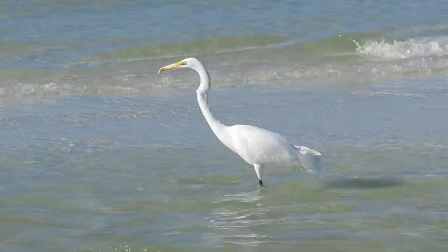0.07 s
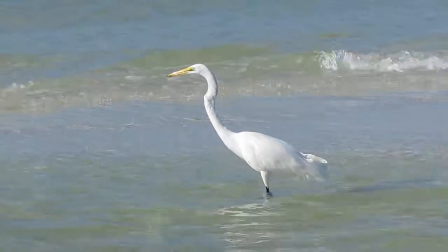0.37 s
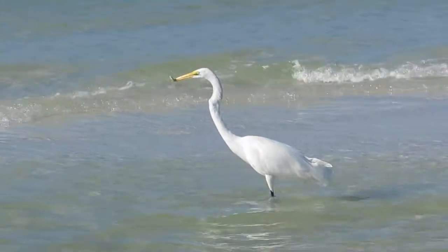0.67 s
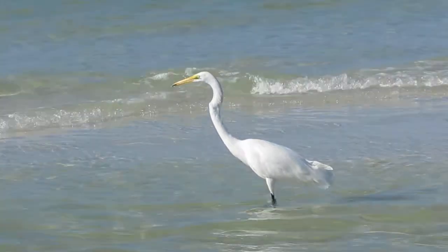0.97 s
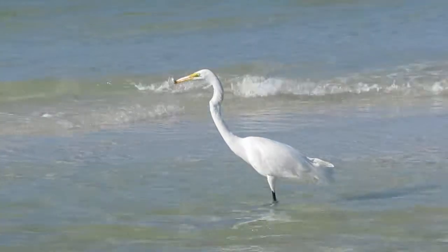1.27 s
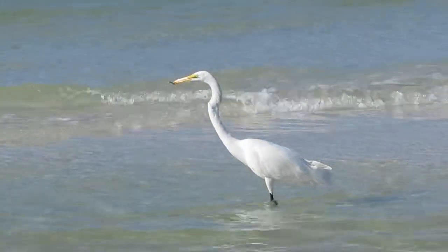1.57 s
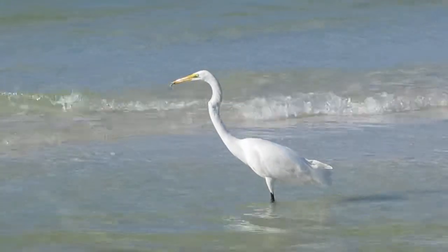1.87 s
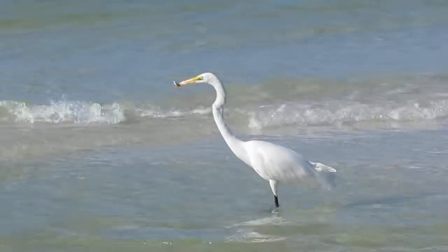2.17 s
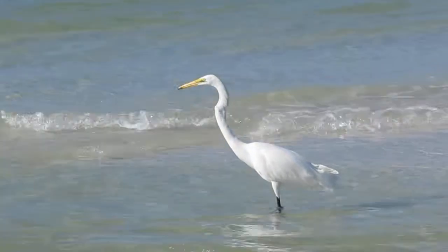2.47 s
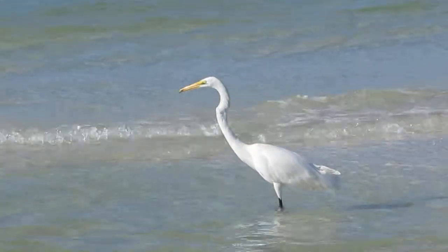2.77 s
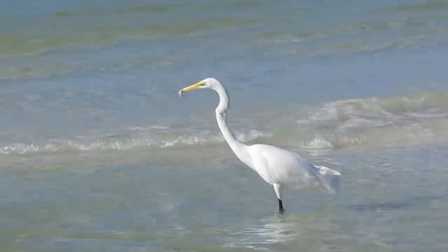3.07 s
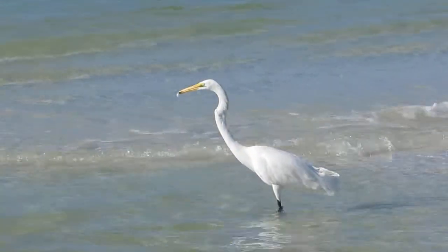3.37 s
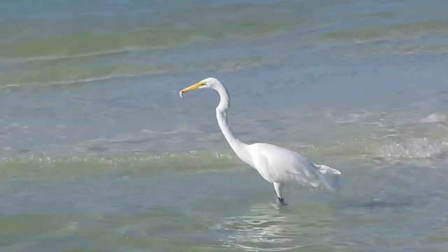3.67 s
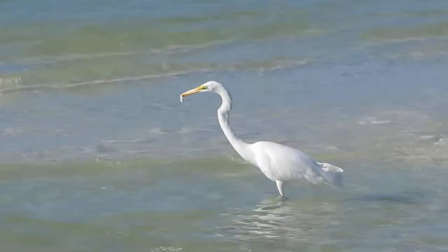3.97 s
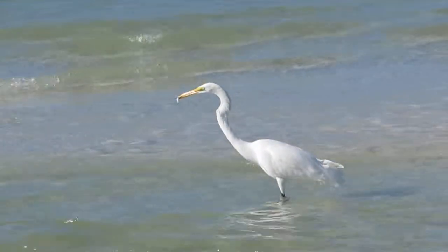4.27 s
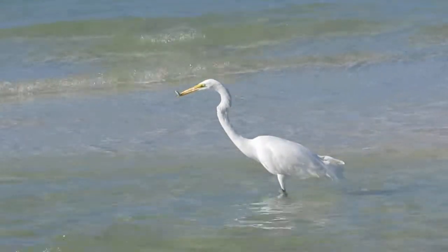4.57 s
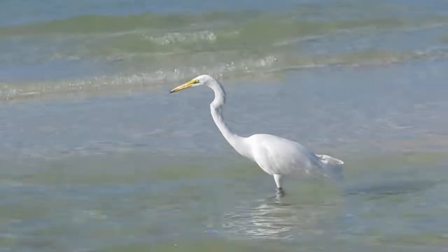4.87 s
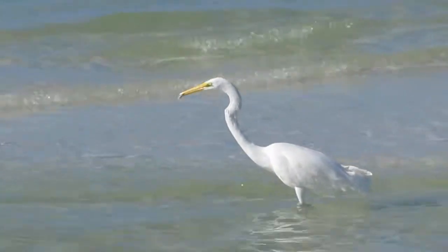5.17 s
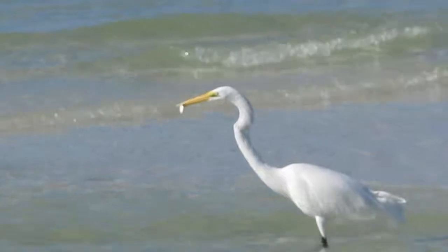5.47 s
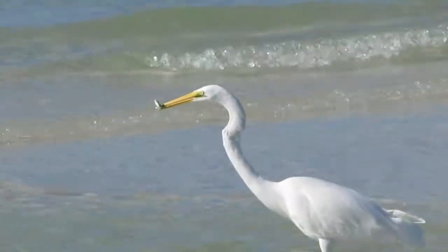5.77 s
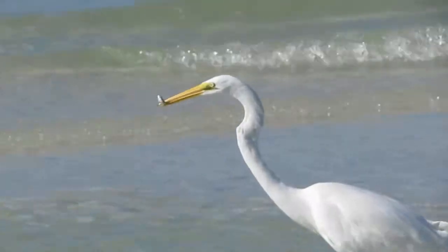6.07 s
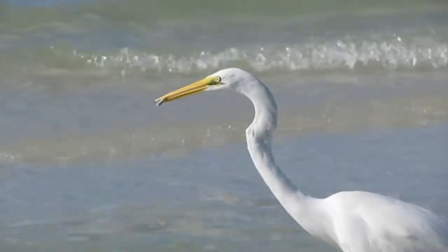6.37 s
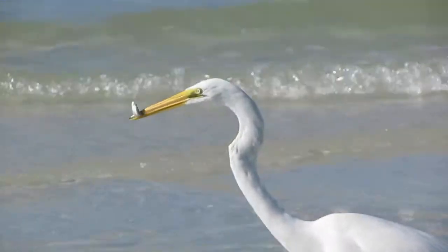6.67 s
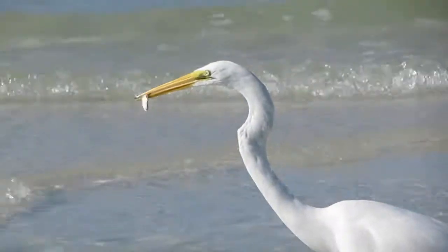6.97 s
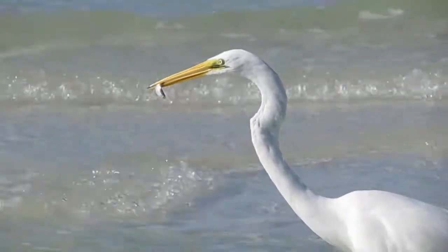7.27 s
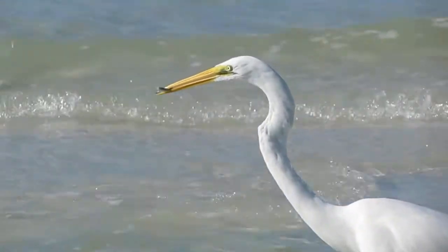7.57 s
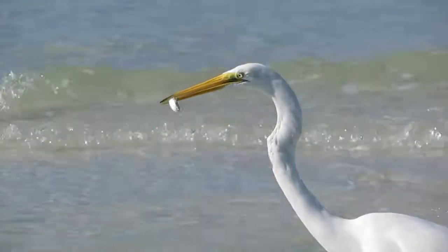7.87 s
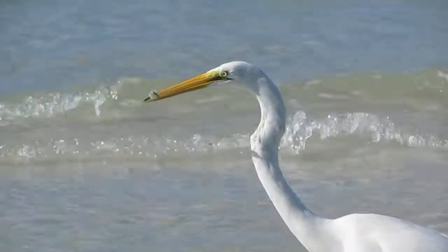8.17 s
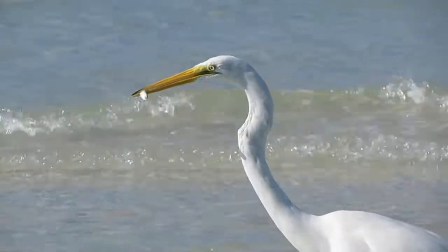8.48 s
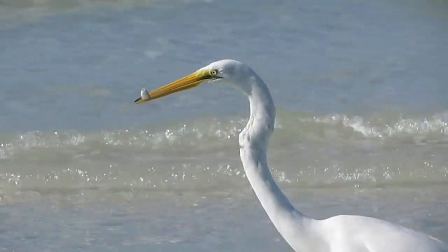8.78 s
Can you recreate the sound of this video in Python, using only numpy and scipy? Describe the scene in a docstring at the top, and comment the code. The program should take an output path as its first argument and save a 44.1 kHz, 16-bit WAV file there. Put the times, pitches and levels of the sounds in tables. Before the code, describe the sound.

Wind rumbles and thumps on the microphone at a beach, with small waves washing faintly behind it.

```python
"""A breeze buffets a stereo microphone on a beach, opening on a click and rumbling throughout.
Eddies flutter and thump on the windward port and a few crack off its rim; the sheltered port only rumbles.
A stereo widener feeds each port to the other side upside down. Behind the wind, small waves break
in the shallows: countless bubbles make the wash and the fizz of foam, and a few drops splash."""
import sys
import numpy as np
from scipy import signal
from scipy.fft import rfft, irfft, next_fast_len
from scipy.io import wavfile
from scipy.ndimage import uniform_filter1d, minimum_filter1d

SR = 44100
rng = np.random.default_rng(int(sys.argv[2]) if len(sys.argv) > 2 else 0)


def digitize_waveform(pressure):
    """Quantize a signal to 16-bit integers and store it at the path in sys.argv[1].

    Rows of a 2-D input are taken as channels; values are limited to [-1, 1].
    """
    field = np.atleast_2d(pressure).T
    bounded = np.clip(field, -1, 1)
    quanta = np.round(bounded * 32767).astype(np.int16)
    wavfile.write(sys.argv[1], SR, quanta)


N = 394254
TIME = np.arange(N) / SR
START_S = 0.0724   # silence until here

# Levels in the tables are relative: each layer gets its final trim in the functions.
# strength of the breeze, as rumble on the ports: time_s, level_db
BREEZE = [(0.13, -12.5), (0.38, -16), (0.52, -16), (0.68, -15.5), (0.92, -14), (1.1, -14.5), (1.22, -15.5),
          (1.33, -15.5), (1.58, -15), (1.87, -15), (2.15, -16.5), (2.27, -17), (2.37, -16.5), (2.47, -12.5),
          (2.61, -20.5), (2.8, -13.5), (3.0, -15.5), (3.13, -14.5), (3.27, -18.5), (3.38, -15), (3.6, -16),
          (3.78, -15), (4.17, -18.5), (4.33, -15), (4.62, -14.5), (4.77, -17), (4.84, -21.5), (4.91, -14),
          (4.99, -20), (5.07, -14.3), (5.24, -18.5), (5.45, -16), (5.62, -15.5), (5.85, -19), (5.99, -15.5),
          (6.25, -18), (6.48, -16), (6.58, -17), (6.68, -15.5), (6.82, -17.5), (7.05, -16.5), (7.19, -14.5),
          (7.37, -16.5), (7.49, -17), (7.72, -18), (7.98, -17.5), (8.1, -15), (8.2, -19), (8.37, -14),
          (8.5, -17.5), (8.71, -15.5), (8.82, -18), (8.94, -15.3)]
# pressure spectrum of the turbulence: frequency_hz, level_db
TURBULENCE_EQ = [(15, -35), (25, -22), (50, -2.5), (100, 0.6), (160, -0.2), (235, -2.5), (350, -6.5),
                 (420, -8), (600, -15.5), (850, -26.5), (1200, -37), (1700, -45), (3000, -76)]
# fader for the deepest rumble: time_s, level_db
DEEP_RUMBLE = [(0.1, -6), (1.4, 2.5), (3.5, 1), (4.7, 3), (5.7, 5), (6.5, 1), (7.9, -1), (8.94, -5)]
# fader for the flutter of small eddies: time_s, level_db
FLUTTER_RIDE = [(0.12, -9), (0.32, -14.5), (0.6, -9.5), (0.95, -11), (1.6, -13.5), (1.8, -11.5), (2.3, -11),
                (2.8, -11.5), (3.2, -12), (3.56, -11.5), (3.78, -14), (4.2, -15), (4.42, -16), (4.8, -16.5),
                (5.05, -13.5), (5.65, -16), (6.05, -12), (6.55, -13), (6.87, -10), (7.2, -14), (7.44, -9),
                (7.75, -14), (8.4, -14), (8.7, -15), (8.94, -14)]
# thumps of the strongest single vortices: centre_s, level_db, pitch_hz
THUMPS = [(0.074, -2, 198), (0.079, 1, 135), (0.085, -6, 125), (0.111, -4, 190), (0.159, -2, 200),
          (0.168, 4, 155), (0.182, -0.5, 200), (0.218, -6, 320), (0.256, 0, 125), (0.296, -0.5, 120),
          (0.486, 1.5, 160), (0.569, -1, 344), (0.598, -4, 200), (0.655, 3, 129), (0.699, -2.5, 230),
          (0.936, 3, 145), (0.992, 2, 190), (1.067, -9, 220), (1.108, -4, 220), (1.341, 3.5, 155),
          (1.367, -4, 237), (1.42, -1, 190), (1.54, 4, 150), (1.764, 0, 185), (1.802, 0.5, 170),
          (1.821, 2, 205), (1.838, 0.5, 105), (1.856, -3, 190), (1.873, 1, 155), (1.976, 0, 191),
          (2.045, 4, 132), (2.248, 1.5, 155), (2.271, 2, 115), (2.299, 1, 133), (2.307, -1, 222),
          (2.471, 2, 175), (2.5, 2, 180), (2.609, -1, 147), (2.823, -14, 280), (2.858, -0.5, 250),
          (2.884, 1.5, 290), (2.888, -1.5, 310), (3.016, -1, 210), (3.053, -8, 330), (3.098, -1, 230),
          (3.122, 0.5, 95), (3.223, 1.5, 110), (3.236, 0, 225), (3.647, -5.5, 230), (3.756, 0, 221),
          (3.926, -7, 340), (3.962, -1, 205), (4.098, -4, 246), (4.412, 0.5, 153), (4.67, 0.5, 141),
          (4.766, -1.5, 130), (4.873, 0.5, 110), (5.061, 1, 146), (5.082, 2, 120), (5.125, 0, 145),
          (5.773, 0.5, 200), (5.891, -1, 114), (5.963, -4.5, 300), (6.027, -7, 220), (6.066, -2.5, 160),
          (6.1, 0, 126), (6.208, 0, 138), (6.405, -6, 230), (6.475, 1, 149), (6.693, -0.5, 141),
          (6.763, -0.5, 131), (6.788, -0.5, 121), (6.848, -0.5, 130), (6.864, -2, 200), (6.877, -1, 140),
          (7.268, -2, 110), (7.449, -2.5, 125), (7.508, -1, 151), (7.611, 5, 135), (8.159, 0, 145),
          (8.252, -9, 248), (8.565, 2.5, 125), (8.585, 0, 165), (8.613, -6, 220)]
# vortices tearing off the port's rim: centre_s, level_db
RIM_CRACKS = [(0.111, -21), (0.135, -24), (0.168, -22), (0.182, -24), (0.219, -29), (1.068, -25),
              (1.108, -23), (1.821, -19), (1.857, -20), (2.299, -22), (2.857, -23), (2.886, -20),
              (5.771, -23)]
# tone colour of the wash: frequency_hz, level_db
WASH_EQ = [(300, 3), (900, 3), (1400, -3), (1900, 0.5), (2700, 0.5), (3200, -2), (3550, -4.5), (4400, -5.5),
           (5600, -9.5), (8200, -11.5), (10000, -15), (12700, -17), (15500, -24)]
# stereo image of the surf: frequency_hz, coherence (0-1), left_lead_rad, left_over_right_db
SURF_IMAGE = [(1720, 0.83, 0.8, 0), (2500, 0.23, 1.57, 2), (3130, 0.1, 2.8, 2), (4020, 0.6, 0.03, 3.5),
              (5660, 1, 1.1, -1), (7000, 0.64, 0.71, 1.5), (8300, 0.3, 1.34, 0.5), (10000, 0.18, 3, 1),
              (13000, 0.3, 3.5, 1.5)]
# small waves spilling in turn: crest_s, level_db, build_s, fade_s, fizz_offset_db
WAVES = [(0.86, -59, .1, 0.14, -5.5), (1.27, -56, 0.11, 0.38, -4.5), (1.73, -56.5, 0.11, 0.15, -3.8),
         (2.2, -62, 0.07, 0.11, -4), (2.445, -59, 0.048, 0.028, -3), (2.84, -58.5, 0.18, 0.14, -5.5),
         (3.7, -63.5, 0.27, .4, -8), (4.55, -58.5, 0.43, 0.79, -8), (4.98, -59.5, .12, 0.07, -9),
         (5.42, -64, 0.053, .15, -6), (5.78, -60, 0.23, 0.26, -5.5), (7.32, -62, 0.15, 0.2, -8.5),
         (7.98, -59.5, 0.2, 0.17, -7), (8.5, -60, 0.3, 0.47, -6.5)]
# fader for the hiss of foam spreading on the sand: time_s, level_db
FOAM_HISS = [(0.12, 5), (0.25, -5), (0.6, 0.5), (0.82, -3.5), (1.3, -5.5), (1.7, -8), (2.1, -7.5),
             (2.55, -4.5), (2.78, -3.5), (3.05, -1), (3.25, -0.5), (3.5, 0), (3.75, 0.5), (4.2, -3),
             (4.8, -3), (5.2, -5), (5.65, -3.5), (6.3, -4), (6.9, -6), (7.28, -3), (7.7, -6.5), (8.05, -8),
             (8.25, -2.5), (8.5, -5.5), (8.94, -5)]
# drops thrown up near the shore: start_s, level_db, pitch_hz
DROPS = [(4.1994, -45, 10300), (4.6688, -37, 5130), (5.385, -49, 8450), (8.2594, -46, 10500),
         (8.7694, -48, 10000)]


def from_db(db):
    """Decibels to gain."""
    return 10 ** (np.asarray(db) / 20)


def unit_rms(x):
    """Scale to unit power."""
    return x / np.sqrt(np.mean(x ** 2) + 1e-20)


def ride(rows):
    """A fader curve of (time, value) rows at every sample."""
    return np.interp(TIME, *np.transpose(rows))


def at_hz(rows, hz, column=1):
    """Read one column of a table on a log-frequency axis."""
    columns = np.transpose(rows)
    return np.interp(np.log(hz + 1e-9), np.log(columns[0]), columns[column])


def eq(x, gain_at):
    """Filter by a gain given as a function of frequency."""
    size = next_fast_len(N + SR // 4)
    return irfft(rfft(x, size) * gain_at(np.fft.rfftfreq(size, 1 / SR)), size)[..., :N]


def crossover(x, hz):
    """Smoothly split into lows and highs that add up to the whole."""
    low = eq(x, lambda f: 1 / (1 + (f / hz) ** 4))
    return low, x - low


def drift(rate_hz):
    """Smooth random modulation of rms 1, moving about rate_hz times a second."""
    times = TIME[::10]
    hz = np.fft.rfftfreq(len(times), times[1])
    slow = irfft(rfft(rng.standard_normal(len(times))) / (1 + (hz / rate_hz) ** 2), len(times))
    return np.interp(TIME, times, unit_rms(slow))


def bounded(modulation, limit=1.88):
    """Round off the rare extremes of a random modulation."""
    return limit * np.tanh(modulation / limit)


def opening_click(decay_s=0.0011):
    """A pressure jump as the sound cuts in, weaker and upside down on the right."""
    jump = (TIME >= START_S) * np.exp(-np.minimum(np.abs(TIME - START_S) / decay_s, 20))
    return from_db(0.5) * np.array([jump, -0.35 * jump])


def eddies(lumpy_db, lumps_per_s, steady_s):
    """Turbulence hits a port in short lumps of pressure around an even mean strength."""
    kicks = rng.standard_normal(N) * from_db(lumpy_db * drift(lumps_per_s))
    pressure = eq(kicks, lambda f: from_db(at_hz(TURBULENCE_EQ, f)))
    power = uniform_filter1d(pressure ** 2, int(steady_s * SR))
    return pressure / np.sqrt(np.abs(power) + 1e-12)


def vortices(rows, trim_db=0):
    """Each passing vortex is one pressure swing of random phase; the smaller, the sharper its slap."""
    out, reach = np.zeros(N), SR // 40
    for (centre_s, level_db, pitch_hz), turn in zip(rows, rng.random(len(rows))):
        centre = int(centre_s * SR)
        near = slice(max(centre - reach, 0), centre + reach)
        swing = np.exp(2j * np.pi * turn) / (1 - 2j * np.pi * pitch_hz * (TIME[near] - centre_s)) ** 2
        out[near] += from_db(level_db + trim_db) * swing.real * np.hanning(len(swing))
    return out


def flaps(per_s, centre_hz, size_spread, spread_db):
    """A random stream of small vortices; the smaller ones sound higher and weaker."""
    step = 100   # samples between possible hits
    pitch_scatter, level_scatter = bounded(rng.standard_normal((2, N // step)))
    hits = np.flatnonzero(rng.random(N // step) < per_s * step / SR)
    pitch_hz = centre_hz * np.exp(size_spread * pitch_scatter[hits])
    level_db = spread_db * level_scatter[hits] - 20 * np.log10(pitch_hz / centre_hz)
    return vortices(np.transpose([TIME[hits * step], level_db, pitch_hz]))


def wind():
    """Rumble and flutter on the windward port, rumble alone in the lee; gusts lift the flutter most."""
    gust_db = 0.5 * drift(rate_hz=13)
    breeze_db = ride(BREEZE) + gust_db
    large, small = crossover(eddies(lumpy_db=2.5, lumps_per_s=97, steady_s=0.08), hz=384)
    deep, body = crossover(large, hz=62)
    # the smallest eddies come in the sharpest bursts
    flutter = small * from_db(7.5 + 7.06 * bounded(drift(rate_hz=110)))
    flutter += from_db(13.5) * flaps(per_s=64, centre_hz=198, size_spread=0.2, spread_db=2.5)
    flutter *= from_db(ride(FLUTTER_RIDE) + 0.41 * gust_db)
    windward = from_db(ride(DEEP_RUMBLE)) * deep + body + flutter
    # only the large, slow eddies reach the lee
    lee = eq(eddies(lumpy_db=3.0, lumps_per_s=22, steady_s=0.17), lambda f: 1 / np.hypot(1, f / 115))
    return from_db(breeze_db) * windward, from_db(breeze_db - 7.0) * lee


def thump_ducking(depth, width_s):
    """A gain that dips as each strong vortex sweeps the ordinary eddies off the port."""
    times = TIME[::10]
    nearest_s = np.abs(times[:, None] - np.array(THUMPS)[:, 0]).min(axis=1)
    return np.interp(TIME, times, 1 - depth * np.exp(-(nearest_s / width_s) ** 2))


def thumps(port_hz):
    """The strongest vortices slap the port, which cannot follow their sharpest edge."""
    dulled, _ = crossover(vortices(THUMPS, trim_db=-1.5), port_hz)
    return dulled


def rim_cracks(pitch_hz):
    """A few vortices tear off the port's rim with a crack."""
    return vortices([(centre_s, level_db, pitch_hz) for centre_s, level_db in RIM_CRACKS], trim_db=4.5)


def widener(ports, crossfeed, cutoff_hz):
    """Subtract a dulled, slightly late share of each port from the other channel."""
    return ports - crossfeed * eq(ports[::-1], lambda f: 1 / (1 + 1j * f / cutoff_hz))


def bubbles(grain_db, pops_per_s, pop_db):
    """Stereo hiss of countless bubbles, the nearer ones popping singly; rms 1."""
    hiss = rng.standard_normal((2, N)) * from_db(grain_db * drift(rate_hz=21))
    pops = (rng.random((2, N)) < pops_per_s / SR) * rng.laplace(size=(2, N))
    size = next_fast_len(N)
    mid, side = rfft(unit_rms(hiss) + from_db(pop_db) * unit_rms(pops), size)
    hz = np.fft.rfftfreq(size, 1 / SR)
    # a long shore reaches the two sides partly alike, and the left one first
    coherence, lead_rad, left_db = (at_hz(SURF_IMAGE, hz, column) for column in (1, 2, 3))
    mid, side = np.sqrt(1 + coherence) * mid, np.sqrt(1 - coherence) * side
    left = mid + side
    right = (mid - side) * np.exp(-1j * lead_rad) * from_db(-left_db)
    spectrum = np.array([left, right]) * from_db(at_hz(WASH_EQ, hz))
    return unit_rms(irfft(spectrum, size)[:, :N])


def swell(sea_db, sea_fizz_offset_db):
    """Wash and fizz envelopes: each wave builds and fades, adding its power to the steady, far sea."""
    times = TIME[::100]
    wash_power, fizz_power = from_db(sea_db) ** 2, from_db(sea_db + sea_fizz_offset_db) ** 2
    for crest_s, level_db, build_s, fade_s, fizz_offset_db in WAVES:
        age_s = times - crest_s
        envelope = np.exp(-np.where(age_s < 0, (age_s / build_s) ** 2, age_s / fade_s))
        power = from_db(level_db) ** 2 * envelope
        wash_power += power
        fizz_power += power * from_db(fizz_offset_db) ** 2
    return np.interp(TIME, times, np.sqrt(wash_power)), np.interp(TIME, times, np.sqrt(fizz_power))


def surf():
    """Small breakers: a broad wash, foam hissing above it and the fizz of spray on top."""
    wash_gain, fizz_gain = swell(sea_db=-59, sea_fizz_offset_db=-6.5)
    wash, spray = crossover(bubbles(grain_db=0.8, pops_per_s=700, pop_db=-8.5), hz=3440)
    hiss, fizz = crossover(spray, hz=5500)
    foam = from_db(ride(FOAM_HISS) + 1.5) * hiss
    return from_db(9.5) * (wash_gain * (wash + foam) + from_db(6.5) * fizz_gain * fizz)


def splashes(decay_s, band_ratio, trim_db):
    """Each drop is a short, high spit of spray."""
    out = np.zeros((2, N))
    for start_s, level_db, pitch_hz in DROPS:
        envelope = (TIME >= start_s) * np.exp(-np.minimum(np.abs(TIME - start_s) / decay_s, 20))
        spray = rng.standard_normal((2, N)) * envelope
        edges_hz = [pitch_hz / band_ratio, pitch_hz * band_ratio]
        band = signal.butter(2, edges_hz, "band", fs=SR, output="sos")
        out += from_db(level_db + trim_db) * signal.sosfilt(band, spray)
    return out


def scene():
    """Wind up front, hitting from the left, with the sea behind it."""
    windward, lee = wind()
    windward *= thump_ducking(depth=0.38, width_s=0.0022)
    windward += thumps(port_hz=1250) + rim_cracks(pitch_hz=500)
    wide_wind = widener(np.array([windward, lee]), crossfeed=0.49, cutoff_hz=1630)
    return opening_click() + wide_wind + surf() + splashes(decay_s=0.011, band_ratio=1.3, trim_db=-5.0)


def record(dry):
    """A silent lead-in, a fast limiter holding the biggest thumps at full scale, then a steep high cut."""
    window = int(0.005 * SR)   # 5 ms limiter
    needed_gain = 1 / np.maximum(np.abs(dry).max(axis=0), 1)
    gain = uniform_filter1d(minimum_filter1d(needed_gain, window), window)
    high_cut = signal.ellip(10, 0.1, 80, 15800, fs=SR, output="sos")
    return signal.sosfilt(high_cut, dry * gain * (TIME >= START_S))


dry = scene()
out = record(dry)
digitize_waveform(out)
```